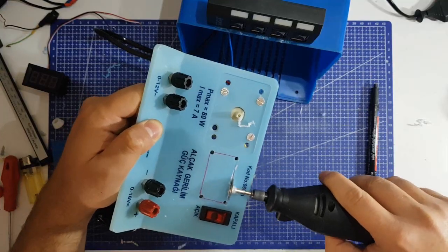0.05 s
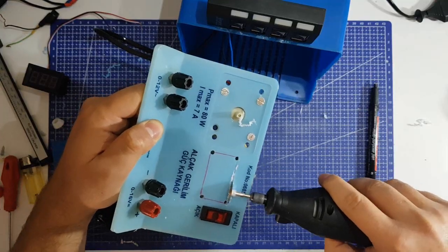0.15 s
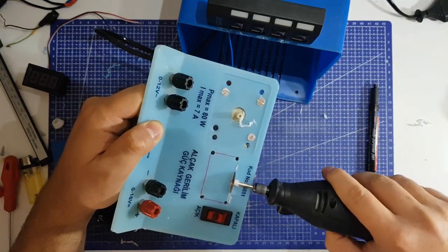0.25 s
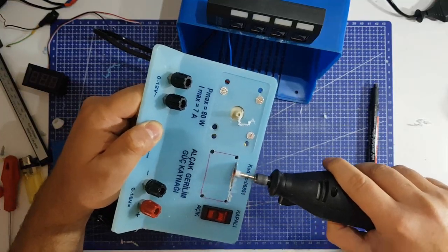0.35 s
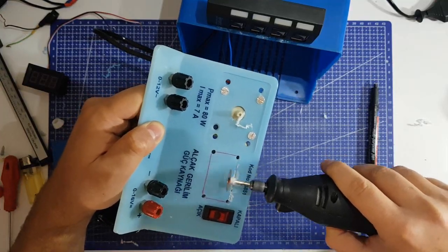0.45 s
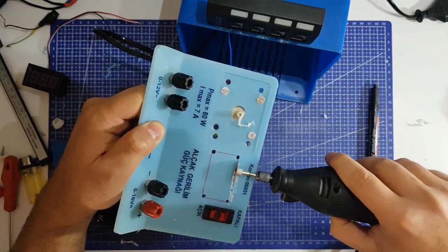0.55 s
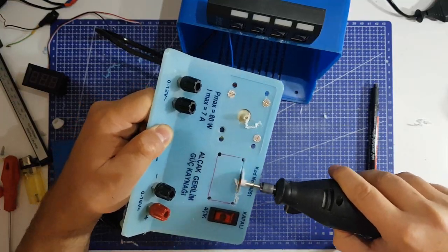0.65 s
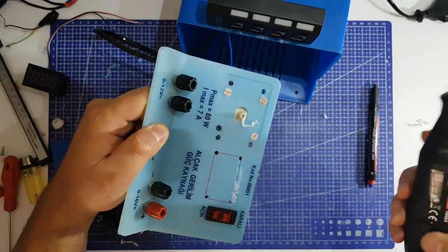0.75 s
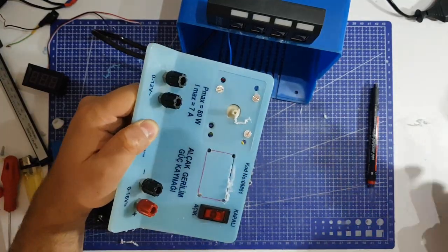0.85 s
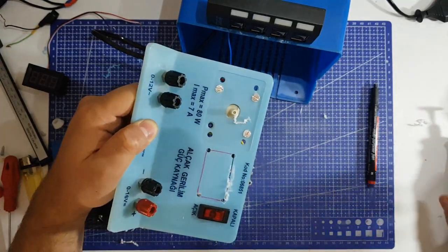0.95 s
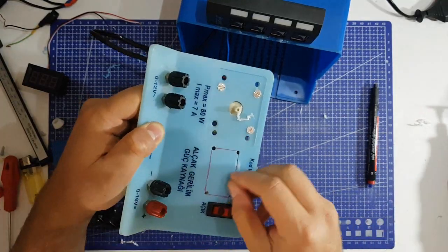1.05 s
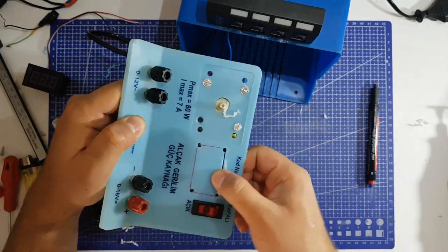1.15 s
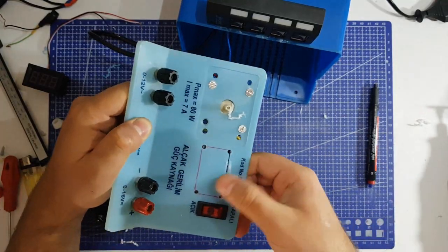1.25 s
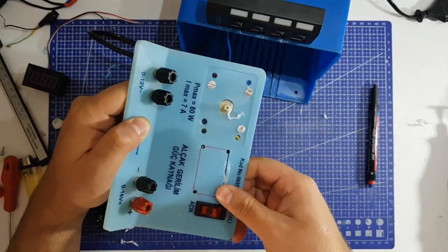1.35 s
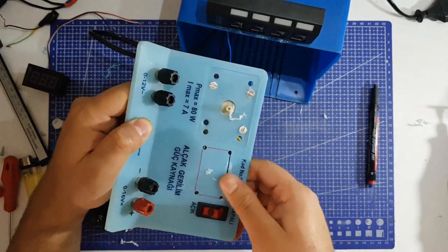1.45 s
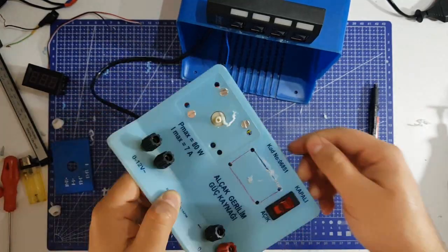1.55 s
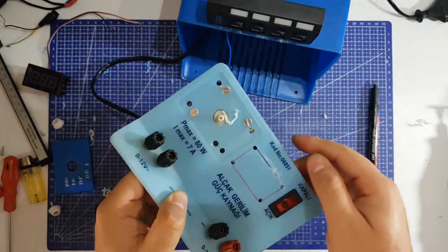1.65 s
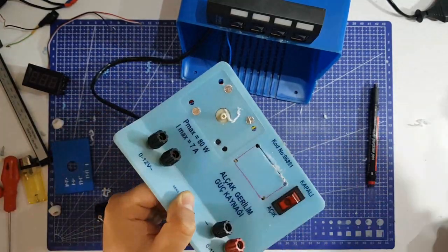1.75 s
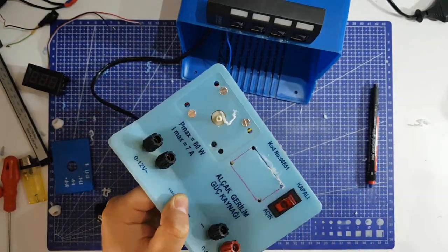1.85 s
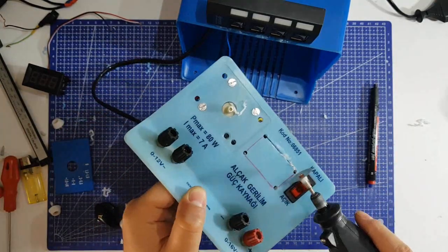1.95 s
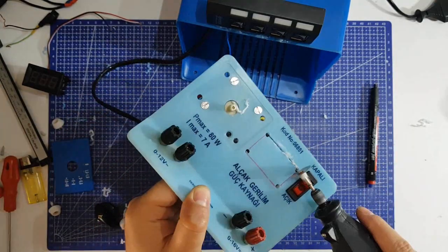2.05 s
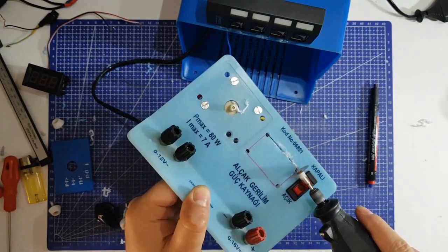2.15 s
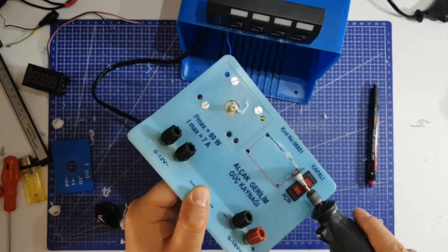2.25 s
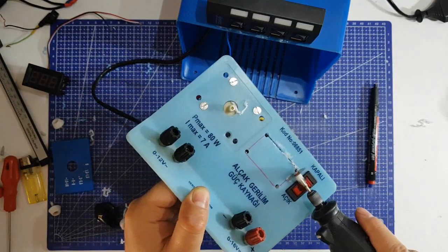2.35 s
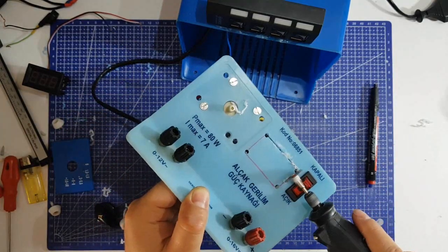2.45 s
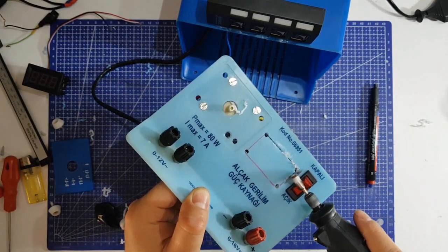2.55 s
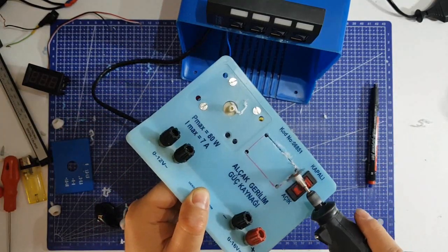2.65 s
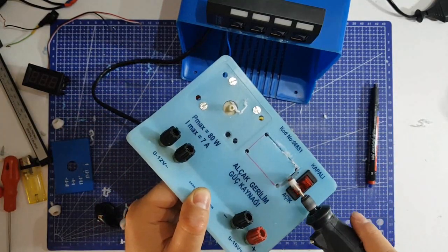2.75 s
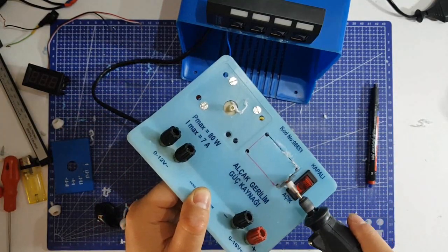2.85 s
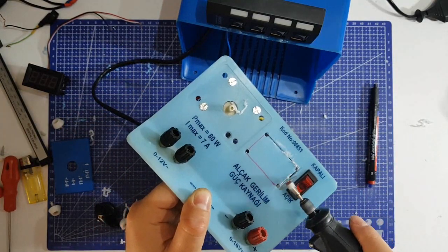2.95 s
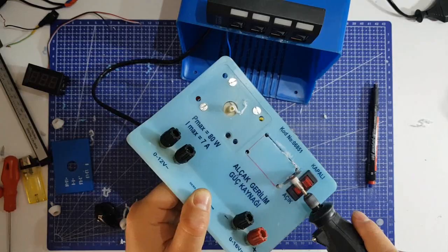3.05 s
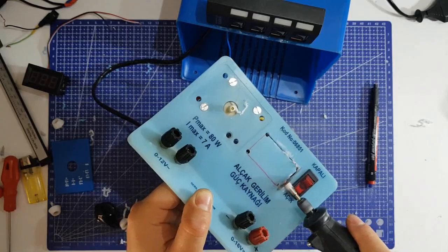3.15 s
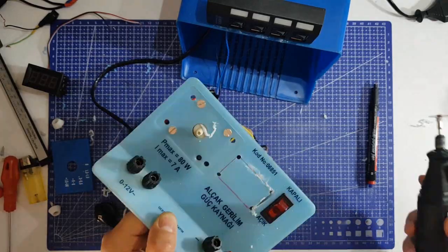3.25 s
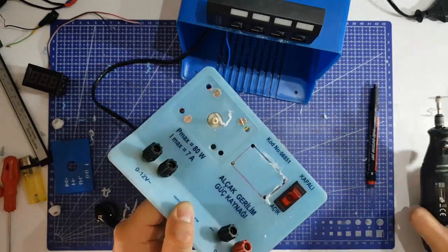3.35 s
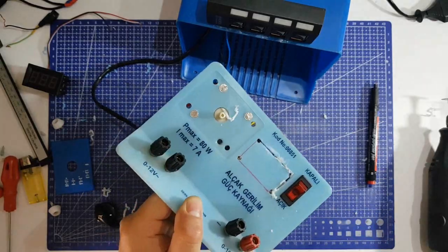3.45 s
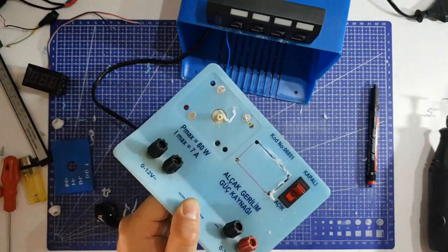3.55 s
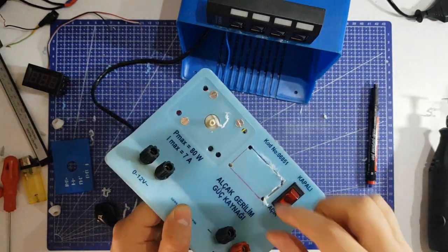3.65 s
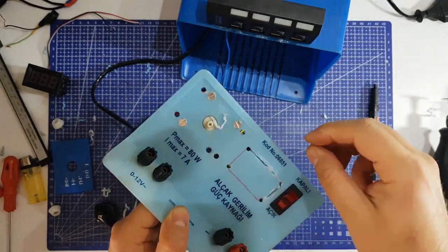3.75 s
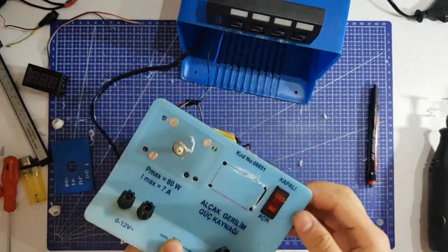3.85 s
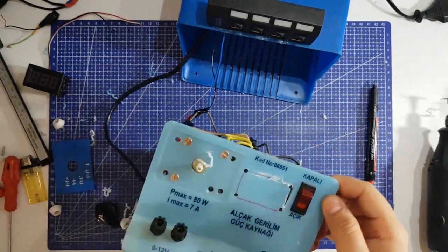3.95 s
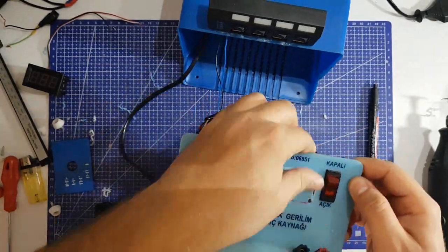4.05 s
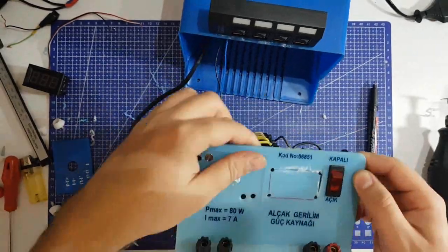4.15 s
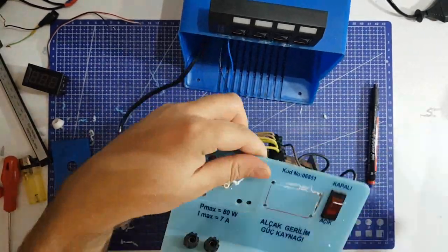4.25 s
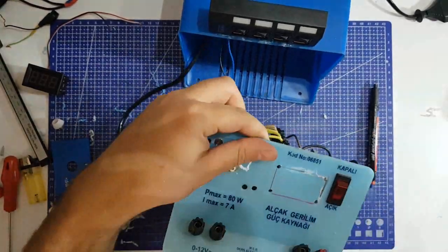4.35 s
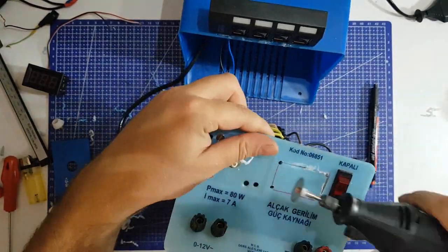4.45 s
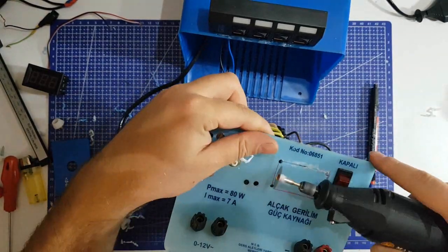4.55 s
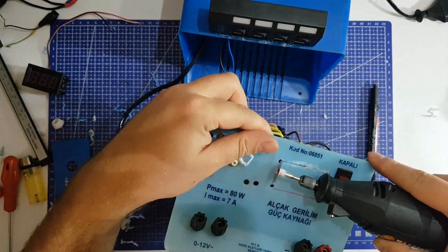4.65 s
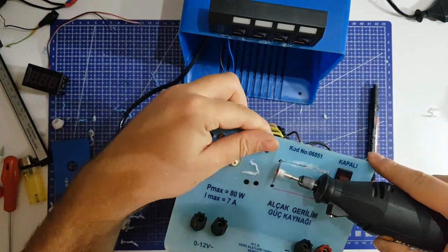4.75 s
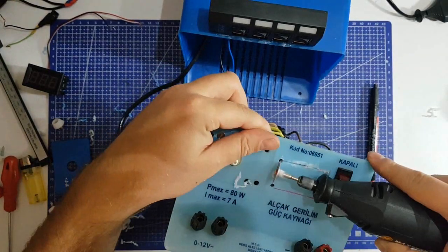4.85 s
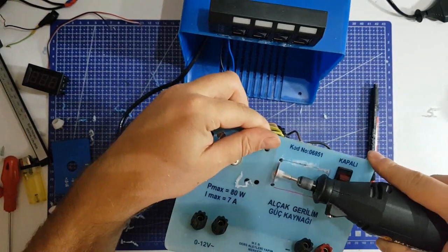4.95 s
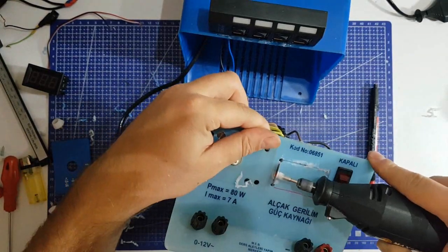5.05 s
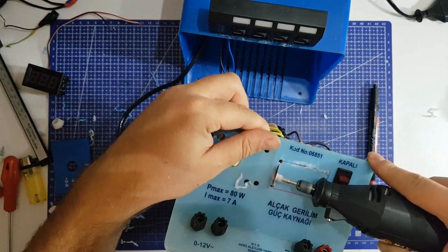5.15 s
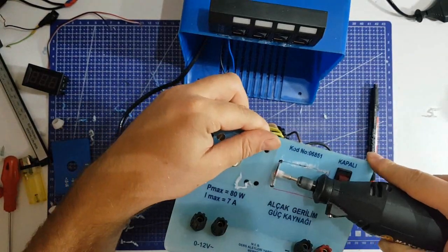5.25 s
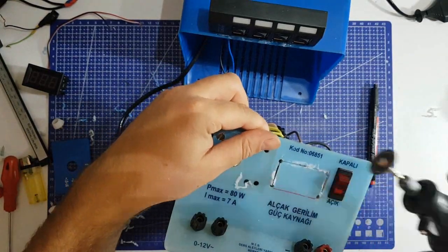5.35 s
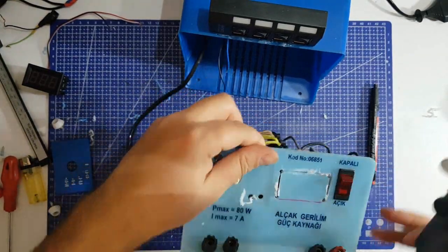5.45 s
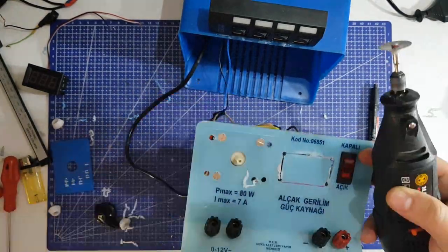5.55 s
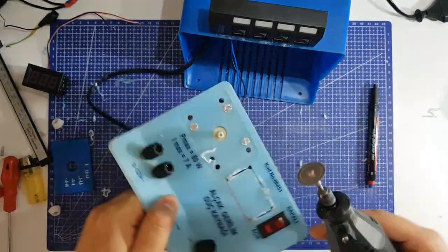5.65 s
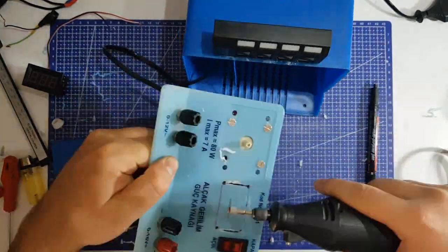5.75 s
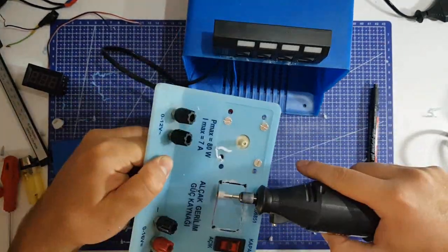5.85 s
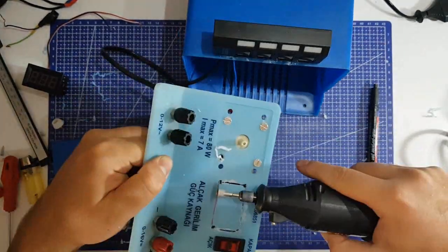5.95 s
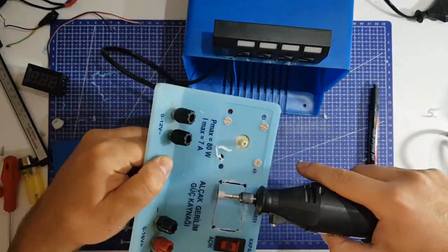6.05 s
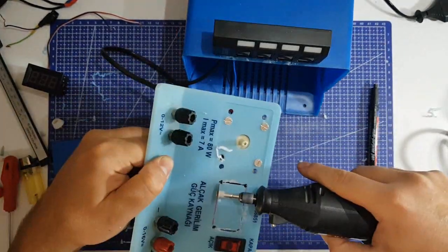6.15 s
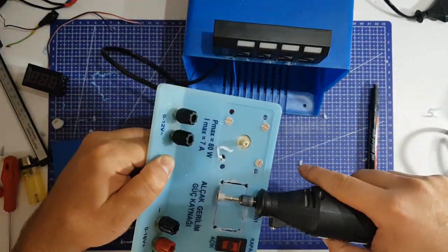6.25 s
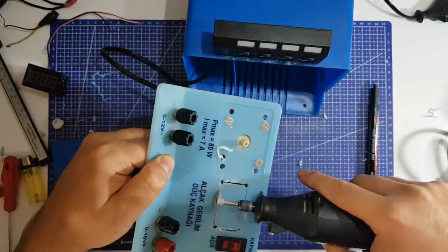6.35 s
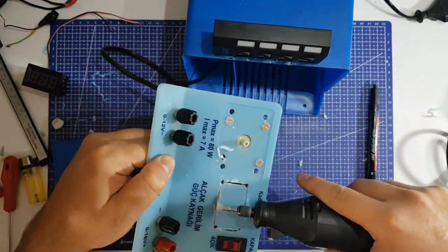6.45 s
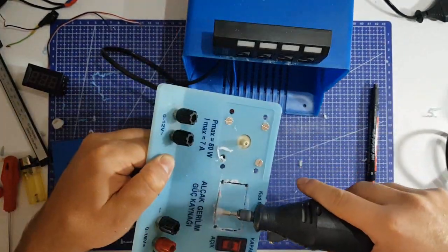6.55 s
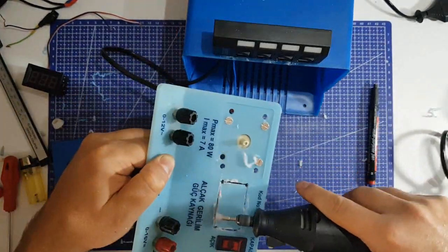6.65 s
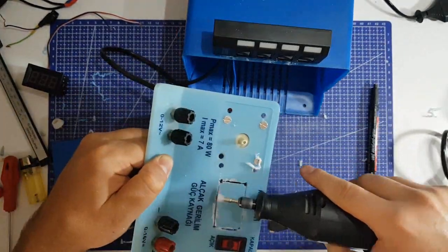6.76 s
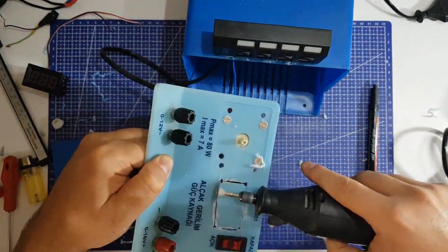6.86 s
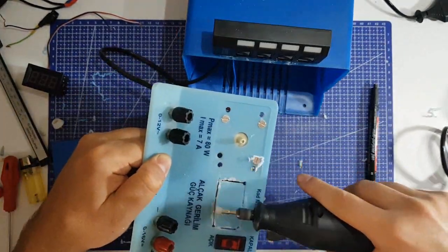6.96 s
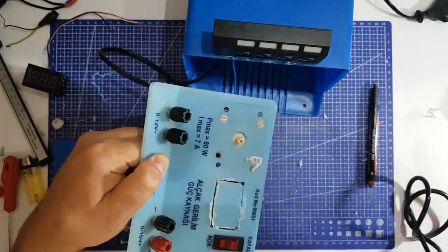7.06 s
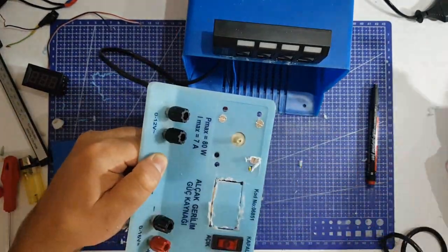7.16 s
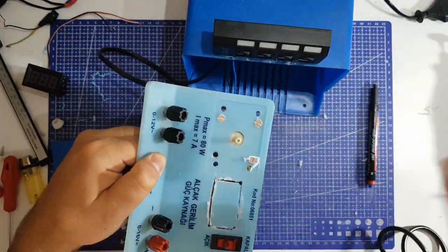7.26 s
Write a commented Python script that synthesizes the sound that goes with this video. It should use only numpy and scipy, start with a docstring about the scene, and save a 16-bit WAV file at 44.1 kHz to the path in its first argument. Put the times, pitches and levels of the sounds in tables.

```python
"""A handheld rotary tool cuts a plastic panel in three runs, close to a mono microphone on a workbench.
Each time the disc bites, its whine sags, at worst nearly stalls, and races up again, while the panel
resonates, chatters and rasps. In the last run the disc is drawn twice along the slot.
Between runs, hands turn the panel, which clacks, knocks and rubs on the mat. The room is small and quiet."""
import sys
import numpy as np
from scipy import signal
from scipy.fft import rfft, irfft, next_fast_len
from scipy.io import wavfile
from scipy.ndimage import uniform_filter1d, minimum_filter1d, map_coordinates

SR = 44100
rng = np.random.default_rng(int(sys.argv[2]) if len(sys.argv) > 2 else 0)


def wav_out(sig):
    """Save sig, one row per channel (or a flat mono array), as 16-bit PCM at SR to the path in sys.argv[1]."""
    wavfile.write(sys.argv[1], SR, np.round(np.clip(np.atleast_2d(sig).T, -1, 1) * 32767).astype(np.int16))


N = 321930
TOP_HZ = 15900  # the recorder's band limit


def amp(db):
    """Decibels to gain."""
    return 10 ** (np.asarray(db) / 20)


def along(points, hz):
    """Read (Hz, value) points on a log axis."""
    f, v = np.transpose(points)
    return np.interp(np.log(hz + 1), np.log(f), v)


def clock(count):
    """Times of the first count samples."""
    return np.arange(count) / SR


def wobble(rate):
    """A smooth random curve with rate knots a second."""
    return map_coordinates(rng.standard_normal(int(N * rate / SR) + 4), [clock(N) * rate])


def filtered(x, response):
    """Weight the spectrum of x by a function of frequency."""
    size = next_fast_len(N + SR // 2)
    return irfft(rfft(x, size) * response(np.fft.rfftfreq(size, 1 / SR)), size)[:N]


def noise(spectrum, rough_db=0, grain_rate=500):
    """Coloured noise of rms 1, clumped into grains before it is coloured."""
    grains = rng.standard_normal(N) * amp(rough_db * wobble(grain_rate))
    x = filtered(grains, lambda hz: amp(along(spectrum, hz)))
    return x / np.sqrt(np.mean(x ** 2) + 1e-20)


def impulse(spectrum, size=1024):
    """A causal pulse of peak 1 with the given spectrum."""
    cepstrum = irfft(np.log(amp(along(spectrum, np.fft.rfftfreq(size, 1 / SR)))))
    pulse = irfft(np.exp(rfft(2 * cepstrum[:size // 2], size)))
    return pulse / np.abs(pulse).max()


def spans(rows, edge):
    """Gain that is up during each (start, end, dB) row, fading over edge seconds."""
    t = clock(N)
    return sum(amp(db) * np.sin(np.pi / 2 * np.clip(np.minimum(t - start, end - t) / edge, 0, 1))
               for start, end, db in rows)


def add(track, s, sound):
    """Mix a sound into the track at time s."""
    part = track[round(s * SR):][:len(sound)]
    part += sound[:len(part)]


def ring(modes, damping):
    """One blow on a set of modes, peak 1, at new strengths each time; damping divides their t60."""
    t = clock(SR // 4)
    x = np.zeros(len(t))
    for hz, db, t60 in modes:
        decay = amp(db + rng.normal(0, 1) - 60 * damping * t / t60)
        x += decay * np.sin(2 * np.pi * (hz * t + rng.random()))
    x *= 1 - np.exp(-t / .0023)
    return x / np.abs(x).max()


def burst(t60):
    """A short dying puff of white noise."""
    t = clock(SR // 4)
    return rng.standard_normal(len(t)) * amp(-60 * t / t60)


# The quiet room behind the bench. Each row: frequency in Hz, relative level in dB.
ROOM_TONE_SPECTRUM = [(25, -40.5), (120, -32.5), (400, -16), (700, -15.5), (900, -10), (1220, 0),
                      (1500, -18), (2400, -15.5), (4000, -28), (5100, -23.5), (8000, -30.5), (16000, -27.5)]


def room_tone():
    """A faint steady hush, far below the tool."""
    return amp(-72) * noise(ROOM_TONE_SPECTRUM)


# The room's decay at the bench. Each row: frequency in Hz, t60 in seconds.
ROOM_DECAY = [(200, 0.074), (800, 0.095), (1200, 0.088), (2000, 0.07), (5000, 0.11), (15000, 0.01)]


def room_echo(x):
    """A short tail, 3 ms behind the direct sound and strongest around the hollow resonances."""
    hz, t, white = signal.stft(rng.standard_normal(SR // 2), SR, nperseg=256)
    colour_db = along([(200, -9), (1200, 7.5), (2500, -.5), (15000, -9)], hz)[:, None]
    decay_db = 60 * t / along(ROOM_DECAY, hz)[:, None]
    tail = signal.istft(white * amp(colour_db - decay_db), SR, nperseg=256)[1]
    return signal.fftconvolve(np.pad(x, (130, 0)), tail / np.linalg.norm(tail))[:N]


# Hands at work near the microphone. Each row: start and end in seconds, slide and scratch levels in dB.
RUBS = [(0.955, 1.01, -63, -70), (1.138, 1.193, -76.5, -58.5), (1.261, 1.273, -68.5, -84.5),
        (1.483, 1.522, -82, -72), (1.589, 1.662, -52, -47), (1.727, 1.761, -74.5, -44.5),
        (3.936, 3.964, -53.5, -42.5), (3.974, 4.03, -50, -82.5), (4.065, 4.129, -53, -99),
        (4.164, 4.209, -51.5, -54.5), (4.347, 4.385, -56.5, -41.5), (5.522, 5.601, -49, -63.5),
        (5.69, 5.847, -45.5, -58), (7.162, 7.309, -60, -56)]
# The rubbed panel and the brighter scratch of fingers. Each row: frequency in Hz, relative level in dB.
RUB_SPECTRUM = [(60, -51), (300, -24), (700, -21), (1150, 9), (1700, -12), (3000, -9.5), (6000, -30.5),
                (16000, -39.5)]
SCRATCH_SPECTRUM = [(500, -14.5), (3000, -9), (6000, -2), (10000, -10), (14000, -9.5), (16000, 1)]


def rubbing():
    """The panel slides on the mat, fingers scratch it, and the grip creaks faintly as it is turned."""
    rubs = np.array(RUBS)
    slide = spans(rubs[:, :3], edge=.0037) * noise(RUB_SPECTRUM, rough_db=6.5, grain_rate=250)
    scratch = spans(rubs[:, [0, 1, 3]], edge=.031) * noise(SCRATCH_SPECTRUM, rough_db=5, grain_rate=350)
    turning = spans([(1, 1.93, -66), (3.96, 4.46, -72)], edge=.017)
    creak = turning * noise(RUB_SPECTRUM, rough_db=5, grain_rate=90)
    return slide + scratch + creak


# Hard plastic clacks on the bench. Each row: start in seconds, level in dB.
CLACKS = [(1.031, -27), (1.037, -42.5), (1.083, -55.5), (3.356, -42.5), (3.506, -32), (3.521, -24.5),
          (3.543, -29.5), (4.35, -30.5)]
# The panel's modes. Each row: frequency in Hz, relative level in dB, t60 in seconds before damping.
PANEL_MODES = [(882, -17.5, 0.06), (1112, -2, 0.08), (1289, 8.5, 0.034), (1668, 2.5, 0.04),
               (1840, -34, 0.01), (2038, -6, 0.08), (2215, 1.5, 0.048), (2420, 23, 0.0054),
               (2960, -16, 0.0057), (3310, -2, 0.0073), (2980, 7.5, 0.042), (4780, -0.5, 0.022)]
# The crack of contact. Each row: frequency in Hz, relative level in dB.
CRACK_SPECTRUM = [(200, -35.5), (700, -11.5), (1200, -9), (2400, 7.5), (3400, 5.5), (4800, -10),
                  (8000, -10.5), (16000, -17.5)]


def clacks():
    """A hard blow gives a crack of noise and rings the panel."""
    body, cracks = np.zeros((2, N))
    for s, db in CLACKS:
        add(body, s, amp(db + 2) * ring(PANEL_MODES, damping=1.25))
        add(cracks, s, amp(db - 4.5) * burst(t60=.041))
    return body + signal.fftconvolve(cracks, impulse(CRACK_SPECTRUM))[:N] / 4


# Light taps on the panel. Each row: start in seconds, level in dB, offset of the nail's tick in dB.
TAPS = [(1.122, -38.5, -7.5), (1.154, -43, 1), (1.279, -46.5, -7), (1.328, -41.5, -11.5), (1.341, -41, -3),
        (1.393, -45.5, -18), (1.414, -37, -3), (1.477, -45.5, -0.5), (1.505, -51, 7.5), (1.569, -41, -15),
        (1.594, -36, -9), (1.735, -43, -7), (1.841, -47, -10.5), (3.831, -40.5, -12.5), (3.981, -38, -9.5),
        (4.077, -39, -37), (4.162, -42.5, -11.5), (4.186, -47, -11), (4.242, -46.5, -13), (4.33, -49, -6)]
# The held panel's low modes. Each row: frequency in Hz, relative level in dB, undamped t60 in seconds.
HOLLOW_MODES = [(775, -19.5, 0.11), (1054, 10.5, 0.018), (1108, -1, 0.04), (1234, 5, 0.027),
                (1390, -32.5, 0.045), (1612, -26.5, 0.16), (2270, -17.5, 0.026)]


def taps():
    """A finger sounds the hollow modes and its nail adds a bright tick."""
    body, nails = np.zeros((2, N))
    for s, db, tick_db in TAPS:
        add(body, s, amp(db) * ring(HOLLOW_MODES, damping=1.87))
        add(nails, s, amp(db + tick_db - 5) * burst(t60=.028))
    return body + signal.fftconvolve(nails, impulse(SCRATCH_SPECTRUM))[:N]


# The swell of a rattle on the mat. Each row: time in seconds, level in dB.
RATTLE_SWELL = [(2.158, -36), (2.195, -30.5), (2.27, -29), (2.36, -40)]


def rattle(per_second=135, scatter_db=4):
    """The panel bounces as the disc comes down: a quick uneven list of (seconds, dB) bumps."""
    s, db = np.transpose(RATTLE_SWELL)
    times = np.arange(s[0], s[-1], 1 / per_second)
    slip, scatter = rng.standard_normal((len(times), 2)).T
    return list(zip(times + .5 * slip / per_second, np.interp(times, s, db) + scatter_db * scatter))


# The panel is pressed down on the bench. Each row: start in seconds, level in dB.
BUMPS = [(5.434, -35.5), (5.458, -22), (5.626, -32), (5.837, -28), (7.025, -27)]
# Its dull thud. Each row: frequency in Hz, relative level in dB.
THUD_SPECTRUM = [(40, -16), (250, -11), (900, 2.5), (1500, -1.5), (2800, -8.5), (5000, -20), (16000, -59)]


def bumps():
    """Pressed or rattling, the panel meets the mat with a thud and a damped hollow ring."""
    track = np.zeros(N)
    for s, db in BUMPS + rattle():
        add(track, s, amp(db - 2.5) * impulse(THUD_SPECTRUM))
        add(track, s, amp(db - 14) * ring(HOLLOW_MODES, damping=2.3))
    return track


def panel_knocks():
    """Clacks, taps and bumps together; so small a plate radiates no bass."""
    low_cut = signal.butter(2, 230, "highpass", fs=SR, output="sos")
    return signal.sosfilt(low_cut, clacks() + taps() + bumps())


# Sharp ticks while the tool runs. Each row: start in seconds, level in dB.
TICKS = [(0.716, -23), (2.486, -28.5), (2.69, -26), (4.756, -32), (4.96, -24), (5.188, -25), (5.256, -32.5),
         (5.529, -36), (5.686, -36), (5.755, -24.5), (5.889, -31.5), (6.027, -29.5), (6.095, -26.5),
         (6.39, -31.5), (6.457, -24), (6.527, -25.5), (6.594, -28.5), (6.664, -21.5), (6.754, -30)]


def ticks():
    """Single dry broadband snaps."""
    track = np.zeros(N)
    for s, db in TICKS:
        add(track, s, amp(db) * impulse([(30, 1.5), (1000, 3.5), (5000, 4), (16000, -5)]))
    return track


def push(start, end, lateness):
    """Pressure on the disc, rising smoothly from 0 to 1 over a bite."""
    progress = np.clip((clock(N) - start) / (end - start), 0, 1)
    return np.sin(np.pi / 2 * progress ** max(lateness, .1)) ** 2


def spin_up(s, from_hz, free_hz, lag_s=.061):
    """From time s the rotor's energy, the square of its speed, relaxes to that of free running."""
    remaining = np.exp(-np.maximum(clock(N) - s, 0) / lag_s)
    return np.sqrt(free_hz ** 2 + (from_hz ** 2 - free_hz ** 2) * remaining)


# The motor's runs. Each row: switch-on and switch-off in seconds, free-running whine in Hz.
RUNS = [(-.06, .883, 3902), (1.966, 3.415, 3879), (4.512, 7.119, 5191)]
# Two long passes along the slot, a list for each. Each row: time in seconds, whine in Hz.
PASS_PITCH = [
    [(4.6, 4488), (4.626, 4617), (4.672, 4818), (4.752, 4997), (4.81, 5030), (4.87, 4588), (4.934, 3903),
     (4.978, 3635), (5.0, 3410), (5.042, 3498), (5.1, 3163), (5.15, 3105), (5.272, 4118), (5.284, 4457),
     (5.318, 4640), (5.438, 4898), (5.484, 5048), (5.56, 5158)],
    [(5.98, 5180), (6.03, 5074), (6.1, 4670), (6.142, 4347), (6.202, 4265), (6.262, 3965), (6.294, 3758),
     (6.312, 3695), (6.366, 3753), (6.456, 3530), (6.528, 3469), (6.6, 3441), (6.636, 2906), (6.666, 2690),
     (6.7, 2883), (6.738, 3390), (6.768, 3766), (6.8, 3267), (6.808, 3250), (6.82, 3360)],
]
# The disc bites ever harder, then lets go. Each row: start and let-go in seconds, lowest whine in Hz,
# lateness of the push (1 is even), release in seconds, levels in dB of fundamental, overtones, rasp,
# hiss and chatter, snagging from 0 to 1, tilt of the upper overtones in dB per octave.
BITES = [(-.03, 0.043, 3009, 0.89, .01, -42, -31.5, -48, -42.5, -50, 0, -12.5),
         (0.036, .084, 1929, 0.56, 0.012, -34.5, -27, -44, -43.5, -65, 0.9, -7),
         (0.075, .167, 1616, 1.14, .012, -33.5, -31.5, -36.5, -54, -62, .2, 3.5),
         (.17, 0.266, 2344, 0.51, 0.0091, -39, -36, -52.5, -46.5, -70, 0.38, 3.5),
         (.258, .312, 2069, 0.68, 0.038, -35.5, -32, -30.5, -43, -53, 0.76, 2),
         (.302, 0.507, 714.8, 1.16, 0.0039, -40.5, -29, -44, -39.5, -49.5, 0.4, 0.5),
         (0.453, 0.532, 561, 0.63, 0.0072, -49, -29, -38.5, -43, -67.5, 1, -7.5),
         (0.606, .612, 3055, .6, 0.0083, -44, -37, -57, -49.5, -67, 0.041, 3.5),
         (.642, 0.669, 2550, 0.95, .01, -39.5, -28, -40, -44.5, -64.5, 0.24, -7),
         (.66, 0.719, 2392, 0.4, 0.0064, -48.5, -33.5, -47, -41, -66, 0.47, 3.5),
         (0.709, 0.782, 1891, 0.41, .01, -40.5, -34, -41, -47, -64, .6, 2),
         (0.773, .802, 1071, 0.95, 0.0025, -52.5, -42.5, -40, -35.5, -67, 1, 4.5),
         (2.21, 2.345, 2684, 1.0, 0.012, -36, -30, -47, -47, -33.5, .1, -8),
         (2.32, 2.411, 788, 1.2, 0.0019, -37.5, -30, -39.5, -44, -59, .1, 0),
         (2.482, 2.545, 3150, 1.07, 0.01, -37, -32.5, -42.5, -42.5, -34.5, 0, 0),
         (2.543, 2.613, 1497, 0.85, 0.0031, -34.5, -34.5, -41.5, -42, -70, 0.049, 1),
         (2.66, 2.728, 3200, 0.85, 0.024, -43, -37.5, -58, -49, -49, 0, 4),
         (2.726, 2.778, 2107, 0.75, .01, -45.5, -39, -49.5, -60.5, -44, 0.72, -5.5),
         (2.786, 2.815, 2730, 0.56, 0.0029, -38.5, -35, -49, -48.5, -32, 0.85, -8),
         (2.855, 2.954, 2420, 1.7, .012, -39, -35.5, -41.5, -43, -43.5, 0.7, -1.5),
         (2.939, 3.029, 1364, 1.2, 0.01, -38.5, -33, -43, -41, -37, 0.9, -4.5),
         (3.075, 3.155, 3103, 0.69, 0.00723, -40.5, -33.5, -41.5, -59, -41.5, 0.38, -6),
         (3.151, 3.193, 1446, 0.79, 0.018, -32.5, -31.5, -40.5, -38, -52.5, 0.59, -11.5),
         (3.21, 3.276, 1380, 0.51, 0.007, -38, -28.5, -44, -48, -45, 1, -7.5),
         (6.915, 7.061, 3280, 1.19, 0.0059, -34, -32.5, -34.5, -50, -53.5, .75, -3.5)]
COAST_HZ_PER_S, SLOWEST_HZ = 25000, 302.2


def motor_pitch():
    """Whine in Hz: the motor spins up, is dragged down by passes and bites, and coasts down."""
    t, pitch = clock(N), np.zeros(N)
    for on, off, free_hz in RUNS:
        run = spin_up(on, 0, free_hz)
        for s, hz in map(np.transpose, PASS_PITCH):
            if on < s[0] < off:
                dragged = np.where(t < s[-1], np.interp(t, s, hz), spin_up(s[-1], hz[-1], free_hz))
                run = np.where(t < s[0], run, dragged)
        for start, end, lowest_hz, lateness, *_ in BITES:
            if on < end < off:
                run += push(start, end, lateness) * (spin_up(end, lowest_hz, free_hz) - run)
        pitch = np.where(t > on, run - COAST_HZ_PER_S * np.maximum(t - off, 0), pitch)
    return np.maximum(pitch, SLOWEST_HZ)


# Fundamental, overtones, rasp and air with the tool held clear of the panel.
# Each row: level in dB at the reference pitch, rise in dB per octave of speed.
FREE_LEVELS = [(-43, 20), (-48.5, 24.5), (-48.5, 14), (-45.5, 7)]


def free_running(pitch, reference_hz=4000):
    """Four gains that grow with speed; the air's hiss drops once the motor is switched off."""
    turning = np.clip(pitch / SLOWEST_HZ - 1, 0, 1)
    octaves = np.log2(pitch / reference_hz)
    fundamental, overtones, grind, air = [turning * amp(db + rise * octaves) for db, rise in FREE_LEVELS]
    coasting = spans([(off, off + .3, 0) for _, off, _ in RUNS], edge=.06)
    return fundamental, overtones, grind, air * amp(-3 * coasting)


# The disc sings in the slot, a list for each pass. Each row: time in seconds, levels in dB of
# fundamental and overtones, tilt of the upper overtones in dB per octave.
PASS_SONG = [
    [(4.76, -34, -88, -1), (4.81, -36.5, -24.5, -24.5), (4.93, -31.5, -21.5, -3.5), (5.0, -37, -34, 6.5),
     (5.13, -43, -36, 7), (5.19, -43, -27.5, 2), (5.42, -44, -31, -10.5), (5.47, -60, -74, -3)],
    [(6.0, -32, -61, 2), (6.04, -34.5, -28, 14.5), (6.19, -39, -46, 11), (6.255, -26, -30, 9.5),
     (6.38, -27, -39, 1), (6.45, -34, -36, -0.5), (6.6, -29.5, -38, 11.5), (6.665, -49.5, -36.5, 0),
     (6.75, -29.5, -37.5, 5.5), (6.82, -44, -38, 7.5)],
]
# The disc snags as each pass ends. Each row: start and end in seconds, depth in dB.
PASS_SNAGS = [(5.3, 5.45, -5), (6.76, 6.84, -4)]
GRIP_PRESSURE, FULL_SAG = .075, .15  # pressure where the disc starts to sing; speed share lost at full load


def disc_contact(pitch):
    """Bites and passes add song, rasp, chatter, snagging and load to the free-running gains."""
    t = clock(N)
    fundamental, overtones, grind, air = free_running(pitch)
    chatter, snag, load, tilt_db = np.zeros((4, N))
    song = amp(9.5 * np.log2(pitch / 3020))  # a slowing disc sings less
    for start, end, _, lateness, release, *voice in BITES:
        tone_db, over_db, grind_db, hiss_db, chatter_db, snagging, bite_tilt_db = voice
        pressure = push(start, end, lateness)
        held = np.exp(-np.clip((t - end) / release, 0, 20))
        grip = held * pressure / (pressure + GRIP_PRESSURE)
        rasp = held * pressure ** 1.1
        fundamental = np.hypot(fundamental, amp(tone_db) * held * np.sqrt(pressure))
        overtones = np.hypot(overtones, amp(over_db) * grip * song)
        grind = np.hypot(grind, amp(grind_db) * rasp)
        air = np.hypot(air, amp(hiss_db) * rasp)
        chatter += amp(chatter_db) * held * np.sqrt(pressure)
        snag = np.maximum(snag, snagging * rasp)
        load = np.maximum(load, grip)
        tilt_db += grip * (bite_tilt_db - tilt_db)
    sag = np.clip((1 - pitch / RUNS[-1][2]) / FULL_SAG, 0, 1)
    for s, tone_db, over_db, pass_tilt_db in map(np.transpose, PASS_SONG):
        contact = spans([(s[0] - .01, s[-1] + .02, 0)], edge=.02)
        fundamental = np.hypot(fundamental, contact * amp(np.interp(t, s, tone_db)))
        overtones = np.hypot(overtones, contact * amp(np.interp(t, s, over_db)))
        grind = np.hypot(grind, amp(-47.5) * contact * sag)
        load = np.maximum(load, contact * sag)
        tilt_db += contact * (np.interp(t, s, pass_tilt_db) - tilt_db)
    snag += spans(PASS_SNAGS, edge=.048)
    return fundamental, overtones, grind, air, chatter, snag, load, tilt_db


# Cooling air, heard close to the tool. Each row: frequency in Hz, relative level in dB.
AIR_SPECTRUM = [(1500, -39.5), (5000, -29.5), (9000, -3), (11700, 1), (14500, -2.5), (16000, -9.5)]


def cooling_air(air):
    """Air rushes through the tool with a high, grainy hiss."""
    return air * noise(AIR_SPECTRUM, rough_db=2.5, grain_rate=360)


# The rasp at the cut. Each row: frequency in Hz, relative level in dB.
GRIND_SPECTRUM = [(30, -24), (200, -23), (600, -16.5), (1200, -5.5), (2000, -14.5), (3200, -6), (4800, 5),
                  (6500, 3.5), (9000, -8.5), (16000, 0.5)]
PULSES_PER_TURN = 7  # cycles of the whine in one turn of the shaft


def grinding(pitch, grind, snag):
    """Chips rasp off the cut in time with the shaft; snags and stalls shake the panel's low modes."""
    shake = np.clip(1 - pitch / 2600, 0, 1) + .17 * snag
    shaft = 2 * np.pi * np.cumsum(pitch / PULSES_PER_TURN) / SR
    throb = 1 + np.clip(1.6 - pitch / 3200, 0, 1) * np.sin(shaft)
    chips = amp(np.clip(7 - pitch / 650, 0, 4) * wobble(170))
    rasp = amp(-4.5) * chips * noise(GRIND_SPECTRUM, rough_db=2.5, grain_rate=630)
    judder = amp(4) * shake * noise(RUB_SPECTRUM, rough_db=4, grain_rate=300)
    return grind * throb * (rasp + judder)


def controller_buzz(whine_phase, fundamental, load, strain, buzz_hz=999.5):
    """The speed controller's pulses modulate the whine and, under load, sing by themselves."""
    phase = 2 * np.pi * buzz_hz * clock(N)
    sideband = amp(-23.5) * fundamental * np.sin(whine_phase + phase)
    waver = amp(2.2 * wobble(25) + 3 * strain * wobble(70))
    effort = load * np.minimum(strain / FULL_SAG, 1)
    return sideband + np.sqrt(2) * amp(-54) * effort * waver * np.sin(phase)


# How strongly tool and panel radiate to the microphone. Each row: frequency in Hz, gain in dB.
RADIATION = [(500.0, -26), (800.0, -1), (1250.0, 14.5), (1650.0, -9), (2200.0, -15), (3000.0, -16),
             (3900.0, -14), (5000.0, -0.5), (6000.0, -9), (8500.0, -15.5), (10500.0, -12), (12000.0, -15.5),
             (14000.0, -7), (16000.0, -15.5)]
# The disc chatters at half the whine pitch when that meets a panel mode.
# Each row: whine in Hz, gain of the chatter in dB.
CHATTER_RESPONSE = [(2300, -39.5), (2620, -9), (2900, -33.5), (3280, 6.5), (3700, 7), (4080, 14),
                    (4350, -20.5)]


def whine(pitch, fundamental, overtones, grind, chatter, snag, load, tilt_db):
    """Harmonics of the spinning tool sweep through fixed resonances; slow or snagging, it shakes."""
    strain = np.clip(1 - pitch / 5200, 0, 1)
    jitter = (.0004 + .005 * strain) * wobble(140) + .009 * strain ** 2 * wobble(900)
    jitter += .022 * snag * wobble(330)
    phase = 2 * np.pi * np.cumsum(pitch * (1 + jitter)) / SR
    flutter_db = .7 + 4 * np.minimum(strain, .5) + 3 * snag

    def partial(multiple):
        hz = multiple * pitch
        db = along(RADIATION, hz) + tilt_db * np.log2(np.clip(multiple / 2, 1, 2))
        db += flutter_db * wobble(130)
        return np.sqrt(2) * amp(db) * np.sin(multiple * phase) * (hz < TOP_HZ)

    def shaft_orders(*orders):
        return sum(partial(order / PULSES_PER_TURN) for order in orders)

    tone = amp(7) * fundamental * partial(.99)
    tone += amp(5) * overtones * sum(partial(k) for k in range(2, 13))
    # under load, uneven pulses bring out the shaft orders between the overtones
    uneven = load * overtones
    tone += amp(-14) * uneven * shaft_orders(16, 18, 19, 23, 26, 30, 33)
    tone += amp(-39.5) * uneven * partial(3 / 8)  # a faint low tone follows the speed
    # near a stall the teeth hammer the slot: a diving comb of high shaft orders
    stall = np.clip(1.3 - pitch / 2500, 0, 1)
    tone += amp(-2) * stall * grind * shaft_orders(16, 18, 23, 25, 30, 32, 38)
    tone += chatter * amp(along(CHATTER_RESPONSE, pitch)) * sum(partial(k + .5) for k in range(6))
    return tone + controller_buzz(phase, fundamental, load, strain)


def rotary_tool():
    """Motor speed and contact with the panel drive the whine, the grinding and the air."""
    pitch = motor_pitch()
    fundamental, overtones, grind, air, chatter, snag, load, tilt_db = disc_contact(pitch)
    tone = whine(pitch, fundamental, overtones, grind, chatter, snag, load, tilt_db)
    return tone + grinding(pitch, grind, snag) + cooling_air(air)


def scene():
    """Tool and hands close to one microphone in a quiet room, the same in both channels."""
    near = rotary_tool() + panel_knocks() + rubbing()
    mono = near + amp(-16) * room_echo(near) + ticks() + room_tone()
    return np.array([mono, mono])


def record(dry, ceiling=.19):
    """The recorder limits the loudest peaks and keeps nothing above its band limit."""
    needed = np.minimum(1, ceiling / (np.abs(dry).max(axis=0) + 1e-9))
    gain = uniform_filter1d(minimum_filter1d(needed, size=300), size=300)
    return np.array([filtered(x * gain, lambda hz: hz < TOP_HZ) for x in dry])


dry = scene()
out = record(dry)
wav_out(out)
```